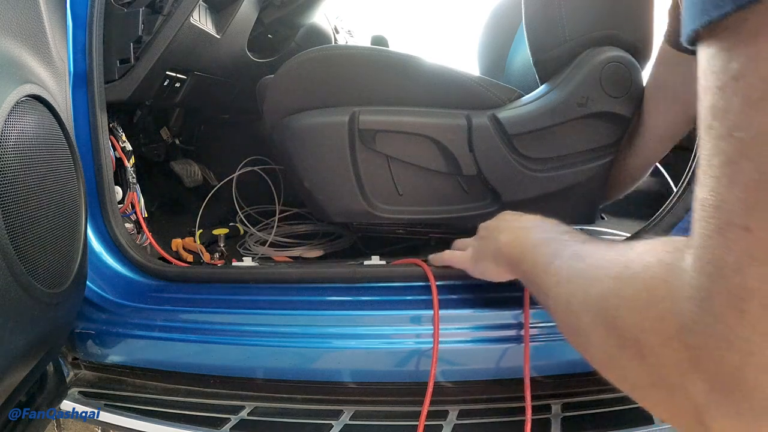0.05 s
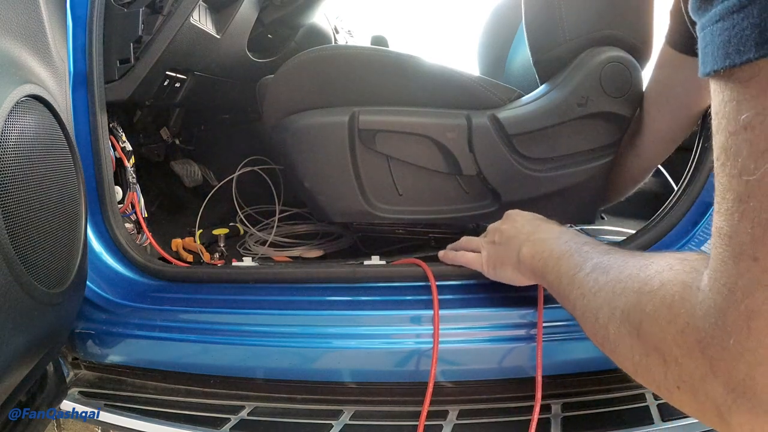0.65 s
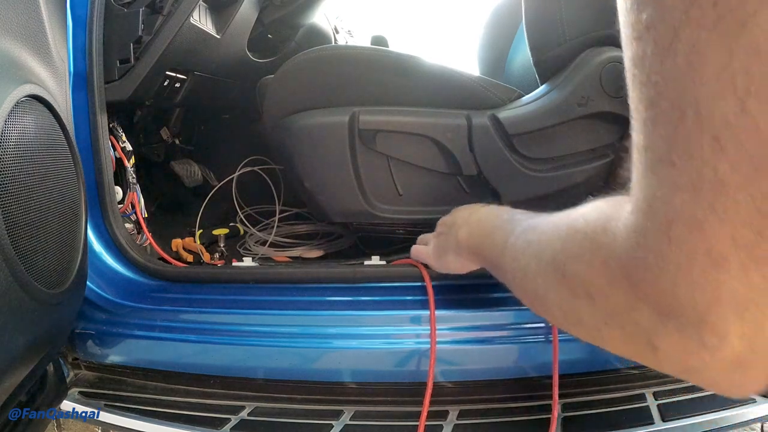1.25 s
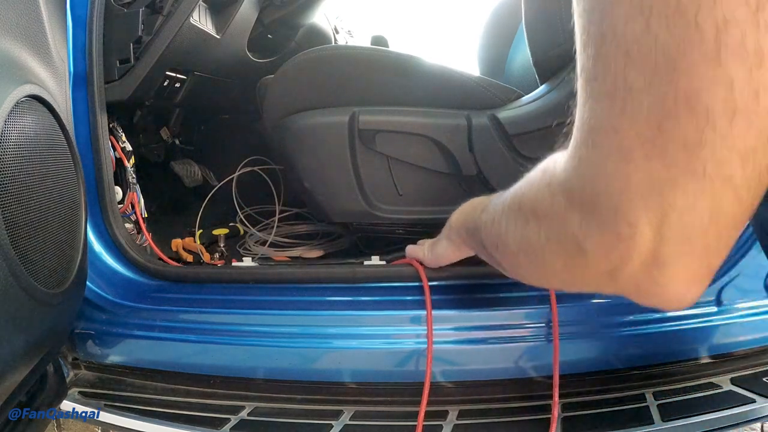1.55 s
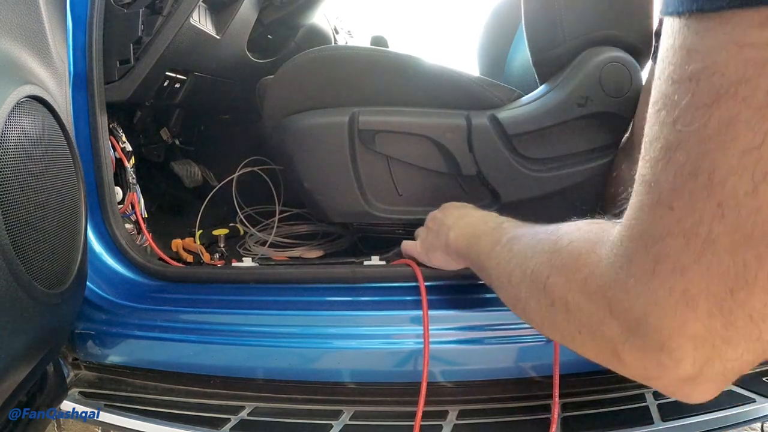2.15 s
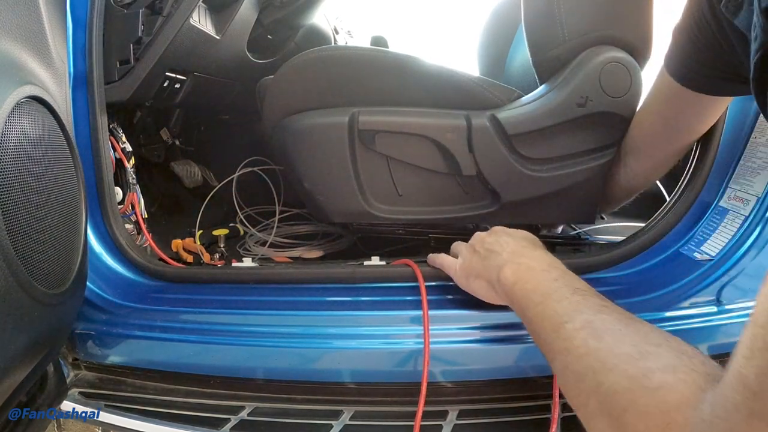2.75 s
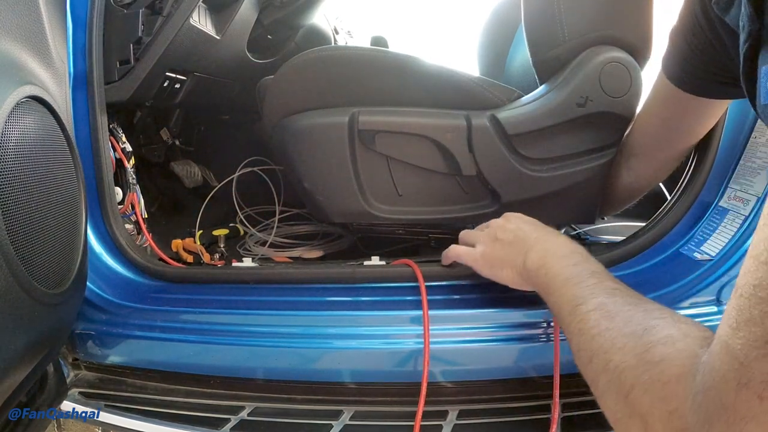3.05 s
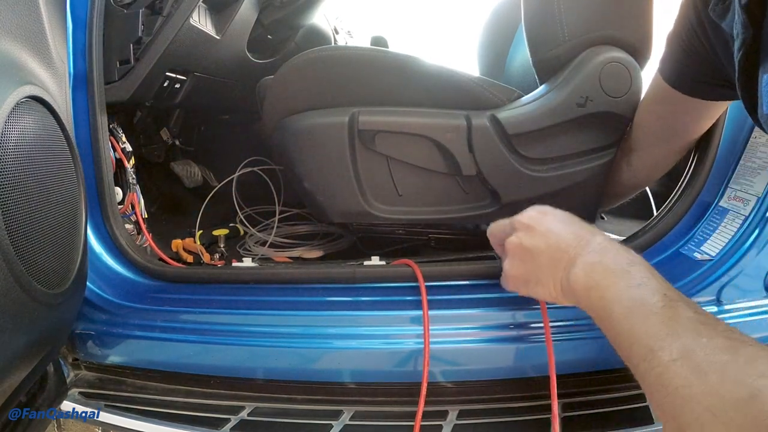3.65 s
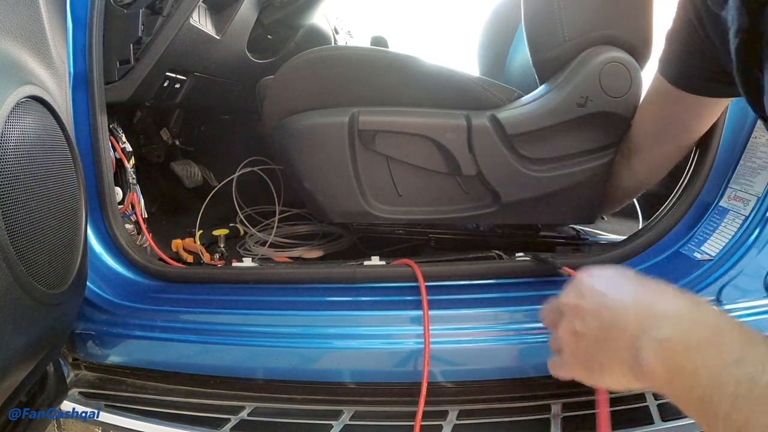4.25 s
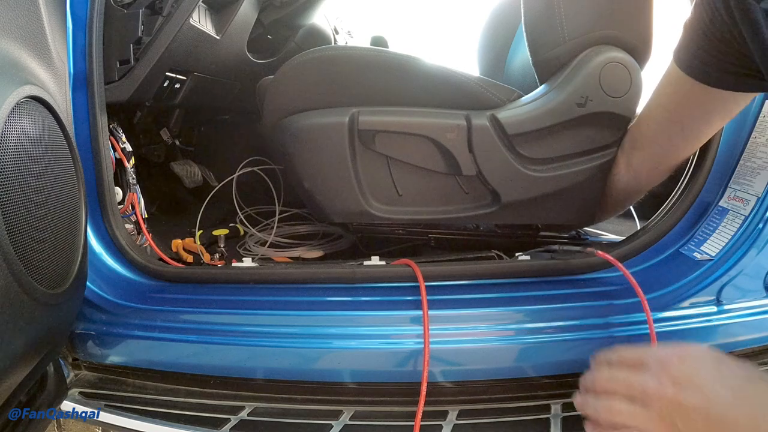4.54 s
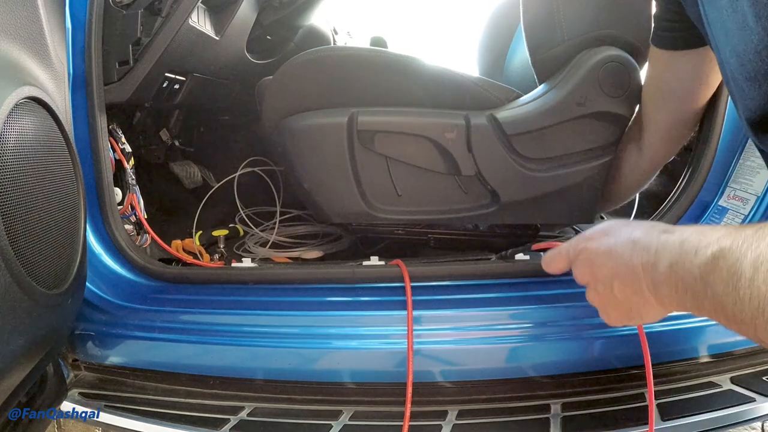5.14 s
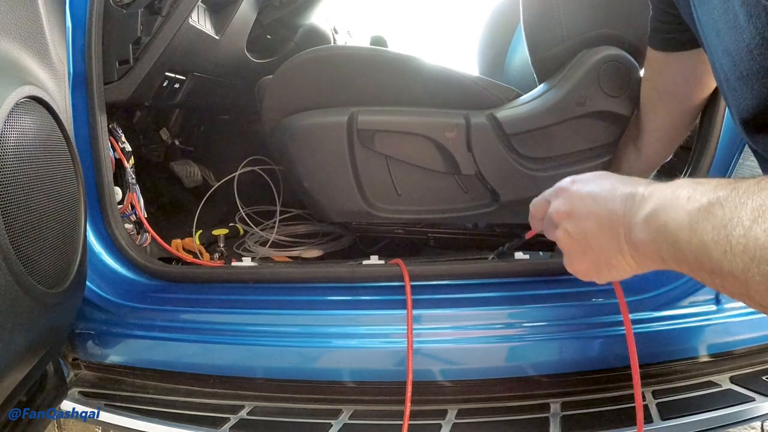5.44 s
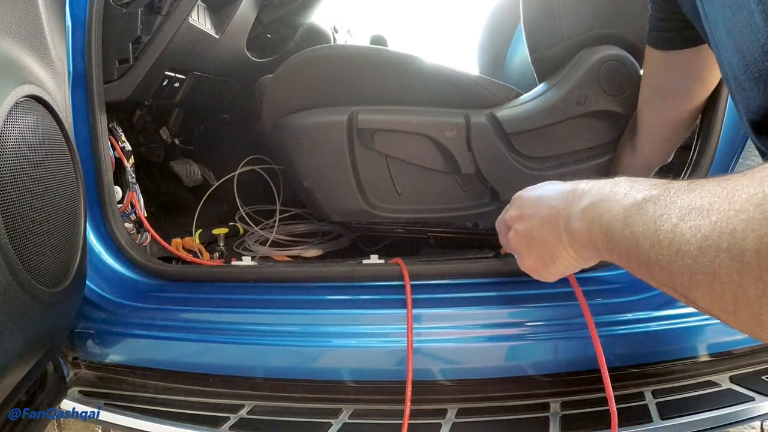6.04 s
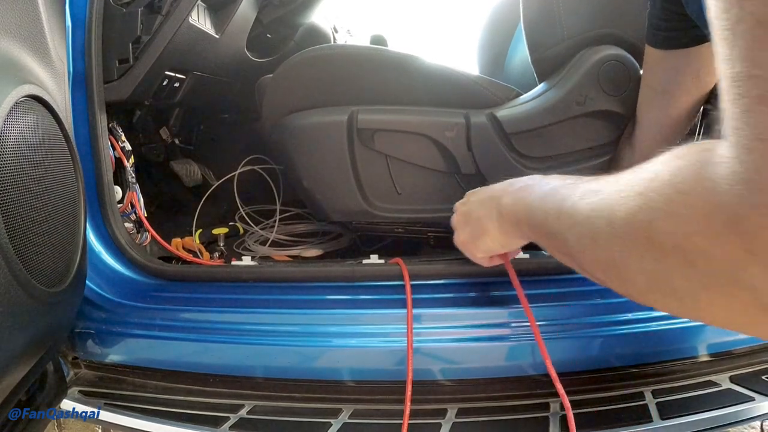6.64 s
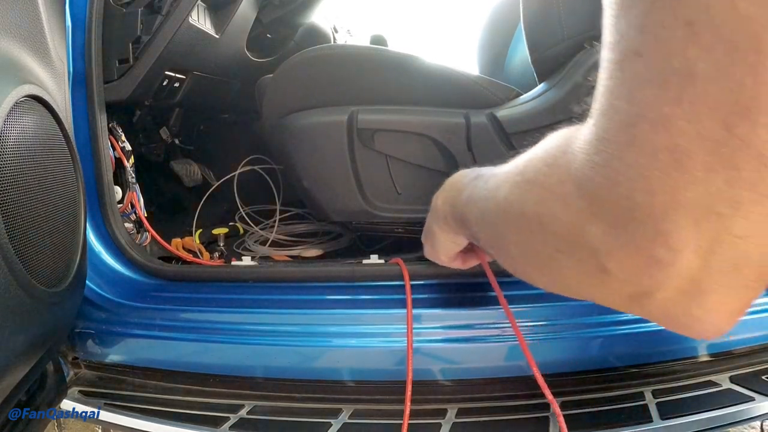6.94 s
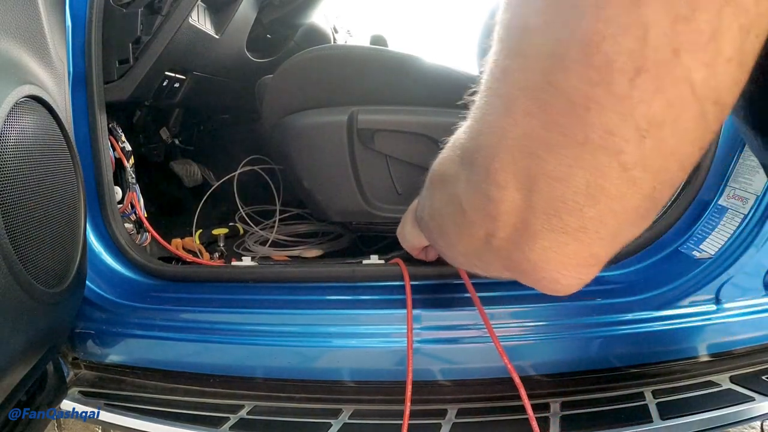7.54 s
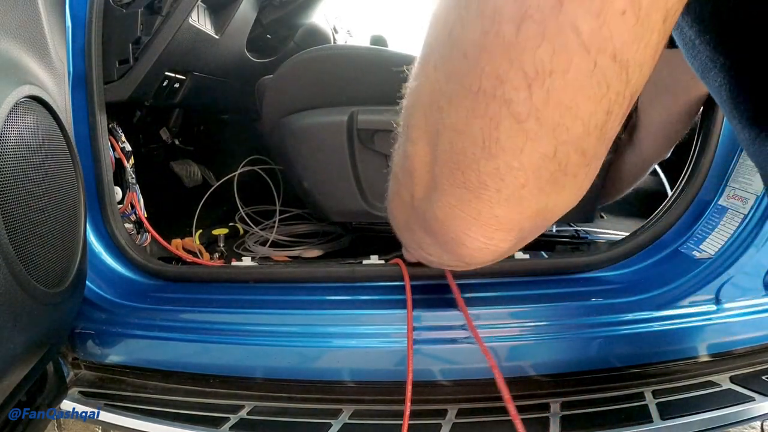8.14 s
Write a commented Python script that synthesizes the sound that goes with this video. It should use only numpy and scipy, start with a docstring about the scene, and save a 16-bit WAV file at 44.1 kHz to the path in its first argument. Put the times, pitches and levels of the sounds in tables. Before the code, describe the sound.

Close, scratchy pulls of a cable and hollow plastic knocks in a car doorway, over faint birds and a quiet outdoor hush.

```python
"""Hollow plastic knocks and scratchy dragging: a power cable is fed by hand under a car seat and along
the sill trim, heard from the open door. Each pull drags it over carpet and plastic in tiny slips; its
jacket sticks and squeaks now and then, and its slaps set the hollow trim thudding and clacking.
Small birds chirp some way off, over a quiet outdoor hush and a thin electronic whine.
Just past the middle, everything cuts out for an instant."""
import sys
import numpy as np
from scipy import signal
from scipy.fft import rfft, irfft
from scipy.io import wavfile
from scipy.ndimage import uniform_filter1d

SR = 44100
rng = np.random.default_rng(int(sys.argv[2]) if len(sys.argv) > 2 else 0)


def output_pcm(signal):
    """Save a mono or channel-first signal as 16-bit PCM at the path in sys.argv[1].

    Samples are clipped to [-1, 1] before scaling.
    """
    pcm = np.clip(np.atleast_2d(signal).T, -1, 1) * 32767
    wavfile.write(sys.argv[1], SR, np.round(pcm).astype(np.int16))


N = 365588
TIME = np.arange(N) / SR

# Pulls of the hand. Each row: start and length in seconds, then relative levels in dB of the rub on
# the hollow trim, the scrape on its edge and the hiss of the jacket.
HAND_PULLS = [(0.172, 0.058, -42, -54.5, -81), (0.532, 0.17, -52, -51.5, -73),
              (0.74, 0.18, -47.5, -56.5, -83), (0.889, 0.096, -47.5, -44.5, -56),
              (0.988, 0.09, -41.5, -35.5, -59.5), (1.144, 0.057, -42.5, -48.5, -69),
              (1.2, 0.12, -34.5, -48, -71), (1.351, 0.17, -41.5, -52.5, -66),
              (1.523, 0.14, -49, -49.5, -60), (1.772, 0.085, -37, -47.5, -65.5),
              (1.938, 0.15, -46, -55, -63), (2.594, 0.11, -51, -75, -77), (3.006, 0.032, -39.5, -52, -75),
              (3.107, 0.12, -40, -44.5, -75), (3.265, 0.26, -34, -59.5, -89.5),
              (3.595, 0.17, -42.5, -69, -71), (3.823, 0.19, -48, -65, -86), (4.43, 0.13, -57, -53.5, -70),
              (5.128, 0.028, -44, -49.5, -61), (5.379, 0.076, -40.5, -59.5, -75),
              (5.696, 0.077, -46, -63, -71), (5.85, 0.053, -43, -74, -112), (6.103, 0.34, -43, -62, -70.5),
              (6.462, 0.16, -38, -60, -83), (6.708, 0.15, -45.5, -57.5, -80),
              (6.962, 0.18, -46.5, -62, -70), (7.159, 0.079, -35, -48.5, -82),
              (7.256, 0.12, -41.5, -65, -85), (7.505, 0.29, -40.5, -50, -76), (7.78, 0.065, -37, -53, -71),
              (7.861, 0.12, -35, -46, -65), (8.065, 0.096, -37.5, -46.5, -69),
              (8.226, 0.041, -50, -53.5, -69)]
# Bright rasps over a sharp edge. Each row: start and length in seconds, relative level in dB.
EDGE_RASPS = [(0.107, 0.15, -55), (0.64, 0.042, -49), (1, 0.05, -44), (3.018, 0.03, -49),
              (3.142, 0.082, -53), (3.288, 0.11, -59), (3.65, 0.06, -49.5), (3.768, 0.029, -43),
              (7.417, 0.026, -54), (7.67, 0.05, -64), (7.866, 0.12, -45.5), (8.073, 0.057, -47),
              (8.243, 0.05, -51.5)]
# Jacket squeaks. Each row: start and length in seconds, first and last pitch in Hz, relative level in dB.
JACKET_SQUEAKS = [(1.03, 0.065, 978, 880, -37), (1.034, 0.068, 1460, 1327, -35.5),
                  (1.449, 0.081, 940, 870, -38), (1.18, 0.12, 530, 560, -37),
                  (3.043, 0.031, 1634, 1800, -46.5), (3.158, 0.032, 1020, 950, -49),
                  (3.229, 0.029, 614, 668, -31), (6.5, 0.17, 1027, 993, -46.5),
                  (6.526, 0.14, 1550, 1490, -51.5), (6.642, 0.082, 1002, 910, -47)]
# Blows on the trim. Each row: start in seconds, thud pitch in Hz, relative thud level in dB,
# clack pitch in Hz, relative clack level in dB, relative tick level in dB.
TRIM_KNOCKS = [(0.06, 230, -34.5, 990, -40.5, -47), (0.586, 556, -27, 1160, -25.5, -60),
               (0.592, 242, -31, 1150, -24, -65), (1.453, 186, -43.5, 1020, -39, -58),
               (1.49, 308, -34, 1030, -40, -55), (2.049, 252, -6.5, 1170, -29, -36.5),
               (2.058, 179, -21, 1190, -41, -38), (2.068, 250, -34, 1130, -33, -41),
               (3.074, 225, -43, 1040, -36.5, -58), (3.147, 296, -35, 1030, -34.5, -55),
               (3.299, 585, -30, 1160, -29, -46), (3.416, 260, -27.5, 1120, -34, -67.5),
               (3.662, 179, -36, 2100, -47, -36.5), (3.697, 210, -31.5, 2070, -29, -57),
               (3.752, 244, -20, 1070, -31, -52), (3.785, 530, -13, 1390, -23.5, -44),
               (3.791, 355, -11.5, 2230, -25.5, -24.5), (3.796, 146.4, -15.5, 1010, -22, -50),
               (4.048, 282, -31.5, 1000, -65, -59), (4.362, 430, -23, 2300, -23, -13),
               (4.363, 256, -31, 2010, -16.5, -18), (4.412, 328, -26, 1970, -35, -27.5),
               (6.077, 298, -32, 920, -40, -37.5), (6.185, 287, -27.5, 1110, -38, -42.5),
               (6.252, 563, -56, 1530, -30, -59), (6.713, 244, -34.5, 1450, -37, -65),
               (6.863, 220, -35.5, 3380, -50, -39), (7.54, 246, -28.5, 1000, -53, -66),
               (7.601, 231, -35, 1050, -45, -35.5)]
# Light clicks as the cable is worked along. Each row: start in seconds, relative level in dB.
LIGHT_CLICKS = [(2.298, -49), (2.344, -52), (2.394, -50), (2.444, -51), (2.476, -48.5), (2.534, -48),
                (2.633, -48), (2.698, -46)]
# Modes of trim and sill. Each row: pitch in Hz, relative level in dB, t60 in seconds before damping.
TRIM_MODES = [(154.7, -9, 0.72), (241, -0.5, 0.39), (298, -3.5, 0.54), (309.3, 2.5, 0.35), (391, -12, 0.56),
              (512, -50, 0.65), (534.5, -13, 0.23), (610, -49, 0.29), (720, -30, 0.077)]
# Tone curves of the cable's contact sounds. Each row: frequency in Hz, relative gain in dB.
RUB_EQ = [(50, -53), (100, -9.5), (150, -2.5), (240, 2.5), (340, -1.5), (450, -6.5), (570, -2.5),
          (760, -19), (1000, -14.5), (1600, -34)]
SCRAPE_EQ = [(300, -17.5), (650, 4.5), (950, 6.5), (1200, -2), (1500, -2.5), (1900, -3), (2500, -7),
             (3300, -13.5), (6000, -19.5)]
HISS_EQ = [(1200, 3.5), (3000, 1), (5000, 5.5), (8000, -1), (12000, -7), (16000, -1.5)]
RASP_EQ = [(900, -18), (1500, 2), (2200, 1.5), (3000, -2.5), (4000, -2), (7000, -36)]
TICK_EQ = [(1200, -50), (2400, 3), (4200, 10.5), (6000, 7.5), (9000, 1), (12000, -5), (16000, -6)]
# Tone curve of a plastic clack. Each row: multiple of its pitch, relative gain in dB.
CLACK_EQ = [(.15, -4.5), (.4, 10.5), (.7, 4), (1, 8.5), (1.3, -1.5), (1.8, -0.5), (2.7, -15.5), (5, -29.5)]
# Falling bird chirps. Each row: start and length in seconds, first pitch in Hz, relative level in dB.
BIRD_CHIRPS = [(0.011, 0.096, 4880, -46.5), (0.34, 0.073, 4940, -39), (0.541, 0.13, 4580, -47),
               (0.865, 0.1, 6520, -41), (1.597, 0.15, 4540, -43), (2.037, 0.053, 4600, -37),
               (2.385, 0.048, 4900, -37), (2.45, 0.04, 3900, -41), (2.528, 0.13, 4590, -45.5),
               (2.849, 0.16, 5420, -40), (3.51, 0.12, 4550, -43), (3.732, 0.13, 4700, -39),
               (4.04, 0.11, 5210, -48), (4.282, 0.087, 6150, -41.5), (4.529, 0.12, 4740, -40),
               (4.737, 0.11, 4530, -44), (5.18, 0.13, 5656, -40.5), (5.47, 0.11, 4730, -49),
               (5.595, 0.12, 4570, -46), (6.164, 0.15, 5690, -42), (6.79, 0.11, 5100, -48.5),
               (6.959, 0.085, 4500, -44.5), (7.07, 0.14, 5600, -42)]
# Short high peeps. Each row: start in seconds, first pitch in Hz, relative level in dB.
BIRD_PEEPS = [(0.729, 5400, -48.5), (1.15, 5900, -41.5), (3.351, 4630, -52), (5.379, 5920, -43),
              (7.75, 5690, -51), (8.2, 5500, -50.5)]
# Tone curve of the outdoor hush. Each row: frequency in Hz, relative gain in dB.
HUSH_EQ = [(15, -37), (25, -19), (86, -8.5), (219, 3), (301, -7.5), (438, -10), (978, -20), (1540, -25.5),
           (2430, -25.5), (3540, -18), (6200, -27), (10600, -29), (11500, -28.5), (12400, -31),
           (15000, -33)]
# Tones of the electronic whine. Each row: frequency in Hz, rms level in dB.
WHINE_TONES = [(11806, -83), (11865, -73.5), (15644, -79), (15703, -66.5)]

PULL_ATTACK_S, PULL_RELEASE_T60 = 0.041, 0.34
CREEP_RUB_DB, CREEP_SCRAPE_DB, CREEP_HISS_DB = -57, -61, -73.5  # the bed between pulls
CHATTER_HZ, CHATTER_HZ_PER_DB, CHATTER_DRIFT = 321, 4, 0.093
CHIRP_END_HZ, CHIRP_FALL_S = 3340, 0.105  # a chirp falls to about this pitch in its closing stretch
PEEP_S, PEEP_SAG = 0.077, 0.87  # length; last pitch as a share of the first


def dragging(rub_gain, scrape_gain, hiss_gain):
    """Dense slips shake the panel, sparser, gritty ones scrape its edge, the finest hiss."""
    panel_slips = slips(rate=980, spread_db=1.5, grip_db=1.8, grip_rate=45)
    body = unit(colour(panel_slips, RUB_EQ))
    ring = unit(signal.fftconvolve(panel_slips, trim_ring(damping=4.9))[:N])
    pressure_db = 20 * np.log10(scrape_gain) - CREEP_SCRAPE_DB
    creak = chatter(slips(rate=1500, spread_db=1, grip_db=6.5, grip_rate=18), pressure_db, width_hz=233)
    rub = undb(-4) * (body + undb(-4.5) * ring) + undb(-6) * creak
    scrape = unit(colour(slips(rate=550, spread_db=1, grip_db=1.8, grip_rate=60), SCRAPE_EQ))
    hiss = undb(11) * unit(colour(slips(rate=10000, spread_db=6.5, grip_db=0.7, grip_rate=52), HISS_EQ))
    return rub * rub_gain + scrape * scrape_gain + hiss * hiss_gain


def slips(rate, spread_db, grip_db, grip_rate):
    """Friction grain: about rate uneven slips a second, swelling as the grip tightens."""
    sizes = undb(spread_db * np.minimum(rng.exponential(size=N), 4)) * rng.choice([-1, 1], N)
    slipping = rng.random(N) < rate / SR
    return unit(slipping * sizes * undb(grip_db * wander(grip_rate)))


def chatter(pulses, pressure_db, width_hz):
    """Slips ring a resonance that rises as the cable is pressed harder on the edge."""
    hz = (CHATTER_HZ + CHATTER_HZ_PER_DB * pressure_db) * (1 + CHATTER_DRIFT * wander(8.2))
    carrier = np.exp(2j * np.pi * np.cumsum(hz) / SR)
    pole = np.exp(-np.pi * width_hz / SR)
    # shift down, smooth, shift back: a moving band-pass
    smoothed = signal.lfilter([1], [1, -2 * pole, pole ** 2], pulses / carrier)
    return unit((carrier * smoothed).real)


def hand_effort():
    """Rub, scrape and hiss gains: the pulls ride on the cable's slow creep."""
    power = np.outer(undb([CREEP_RUB_DB, CREEP_SCRAPE_DB, CREEP_HISS_DB]) ** 2, np.ones(N))
    for start, length, *levels_db in HAND_PULLS:
        for layer, db in zip(power, levels_db):
            add(layer, start, (undb(db) * stroke(length)) ** 2)
    return np.sqrt(power) * undb(wander(16))  # the hand's force wavers by about 1 dB


def stroke(length):
    """Envelope of one pull: the hand takes up the slack, holds, and the cable slides to rest."""
    t = TIME[:SR]
    attack = np.sin(np.pi / 2 * np.minimum(t / PULL_ATTACK_S, 1))
    return attack * fade(np.maximum(t - length, 0), PULL_RELEASE_T60)


def rasps():
    """Quick, coarse slips ring the thin edge of the plastic."""
    gain = np.zeros(N)
    for start, length, db in EDGE_RASPS:
        add(gain, start, undb(db) * stroke(length))
    return gain * unit(colour(slips(rate=790, spread_db=-3, grip_db=0.5, grip_rate=44), RASP_EQ))


def squeaks():
    """The jacket sticks and slips regularly enough to sing, with a weak octave on top."""
    out = np.zeros(N)
    for start, length, start_hz, end_hz, db in JACKET_SQUEAKS:
        phase, swell = gliding_tone(length, start_hz, end_hz, waver=0.042, waver_rate=450)
        add(out, start, undb(db) * swell * (np.sin(phase) + undb(-25) * np.sin(2 * phase)))
    return out * undb(1.4 * wander(90))


def knocks():
    """Each blow layers a thud, a floor-pan boom, a clack and a tick; the lightest touches only click."""
    out = np.zeros(N)
    for start, thud_hz, thud_db, clack_hz, clack_db, tick_db in TRIM_KNOCKS:
        add(out, start, undb(thud_db + 1) * thud(thud_hz, ring_db=-6, rumble_db=-9.5))
        boom_db = 1.25 * thud_db - 2.5  # heavy blows bring out the floor pan
        add(out, start, undb(boom_db) * flex(hz=139, rise_cycles=1.48))
        add(out, start, undb(clack_db - 5.5) * clack(clack_hz, t60=0.025, tail_db=-14.5, tail_t60=0.24))
        add(out, start, undb(tick_db - 6.5) * crack(TICK_EQ, t60=0.0074, tail_db=-14, tail_t60=0.17))
    for start, db in LIGHT_CLICKS:
        add(out, start, undb(db) * clack(hz=1200, t60=0.012, tail_db=-8, tail_t60=0.11))
    return out


def thud(hz, ring_db, rumble_db):
    """The struck panel hands its motion on to the sill's modes and the car body."""
    t = TIME[:SR // 2]
    ring = trim_ring(damping=2.3, reach_hz=1.6 * hz)
    rumble = colour(rng.standard_normal(len(t)) * fade(t, 0.28), RUB_EQ)
    tail = undb(ring_db) * ring / np.abs(ring).max() + undb(rumble_db) * rumble / np.abs(rumble).max()
    return flex(hz, rise_cycles=1) + tail * (1 - np.exp(-t * hz))


def flex(hz, rise_cycles):
    """A panel swings for a few cycles."""
    cycles = TIME[:SR // 2] * hz
    rise = cycles / rise_cycles
    return -rise ** 2 * np.exp(2 - 2 * rise) * np.sin(2 * np.pi * cycles)


def trim_ring(damping, reach_hz=SR):
    """The hollow trim rings after one blow; a soft blow hardly wakes the modes above reach_hz."""
    t = TIME[:SR // 2]
    ring = np.zeros(len(t))
    for hz, db, t60 in TRIM_MODES:
        gain = undb(db) / np.hypot(1, (hz / reach_hz) ** 2)
        ring += gain * fade(t * damping, t60) * np.sin(2 * np.pi * hz * t + rng.uniform(0, 2 * np.pi))
    return ring


def clack(hz, t60, tail_db, tail_t60):
    """A crack of plastic, voiced around one pitch."""
    return crack([(multiple * hz, db) for multiple, db in CLACK_EQ], t60, tail_db, tail_t60)


def crack(eq, t60, tail_db, tail_t60):
    """A brief burst of plastic vibration with a weaker rattle behind it."""
    t = TIME[:SR // 3]
    envelope = fade(t, t60) + undb(tail_db) * fade(t, tail_t60)
    burst = colour(rng.standard_normal(len(t)) * envelope, eq)
    return burst / np.sqrt(np.mean(burst[:SR // 100] ** 2))  # the first 10 ms set the level


def doorway(x, wet_db, t60, left_treble_db):
    """Places a sound on the right, reaching the left ear later, with short cabin reflections."""
    t = TIME[:SR // 6]
    response = two_ears(len(t), split_hz=5900) * fade(t, t60) * (1 - np.exp(-t / 0.0025))
    response = low_cut(response, hz=700, order=1)  # the bass escapes through the open door
    response *= undb(wet_db) / np.sqrt(np.sum(response[0] ** 2))
    response[0, 4] += 1  # the direct sound, four samples late on the left
    response[1, 0] += 1
    ears = signal.fftconvolve(x[None], response)[:, :N]
    bass = signal.sosfiltfilt(signal.butter(1, 1800, fs=SR, output="sos"), ears)
    return bass + undb([[left_treble_db], [1.5]]) * (ears - bass)  # the left is shaded in the treble


def birds():
    """Broken, falling whistles that open cleaner and turn raspy."""
    song = np.zeros(N)
    calls = [(start, length, hz, CHIRP_END_HZ * (1 + 0.045 * rng.standard_normal()), db)
             for start, length, hz, db in BIRD_CHIRPS]
    calls += [(start, PEEP_S, hz, PEEP_SAG * hz, db) for start, hz, db in BIRD_PEEPS]
    for start, length, start_hz, end_hz, db in calls:
        whistle, swell = gliding_tone(length, start_hz, end_hz, waver=0.068, waver_rate=800,
                                      glide_s=CHIRP_FALL_S, onset_waver=0.55, softness=0.6)
        rasp, _ = gliding_tone(length, 0.98 * start_hz, end_hz=3705, waver=0.1254, waver_rate=1300,
                               onset_waver=0.71)
        add(song, start, undb(db) * swell * (np.sin(whistle) + undb(-4) * np.sin(rasp)))
    return song * unit(undb(2 * wander(130)))  # a fast flutter breaks up the notes


def yard(x, direct_db, t60, echo_rate):
    """Walls around the yard scatter echoes; the far ones answer late, so the tail starts softly."""
    t = TIME[:SR]
    echoes = rng.standard_normal((2, len(t))) * (rng.random((2, len(t))) < echo_rate / SR)
    response = echoes * fade(t, t60) * (1 - 0.5 * fade(t, 0.26))
    response /= np.sqrt(np.sum(response ** 2, axis=1, keepdims=True))
    return undb(direct_db) * x + undb([[-0.8], [1.1]]) * signal.fftconvolve(x[None], response)[:, :N]


def background():
    """The bed: outdoor hush, faint air at each ear and the thin whine of electronics."""
    hush = unit(np.array([colour(x, HUSH_EQ) for x in two_ears(N, split_hz=800)]))
    air = unit(signal.sosfilt(signal.butter(1, 30, fs=SR, output="sos"), rng.standard_normal((2, N))))
    whine = sum(undb(db) * np.sqrt(2) * np.sin(2 * np.pi * hz * TIME) for hz, db in WHINE_TONES)
    return hush * undb(-50 + 0.3 * wander(5.9)) + undb(-94) * air + whine


def gliding_tone(length, start_hz, end_hz, waver, waver_rate, glide_s=1, onset_waver=1, softness=0.18):
    """Phase and envelope of an unsteady tone that glides and settles within its last glide_s."""
    progress = np.linspace(0, 1, int(length * SR))
    knots = np.arange(0, length, 1 / waver_rate)
    jitter = np.interp(progress * length, knots, rng.standard_normal(1024)[:len(knots)])
    jitter *= np.interp(progress, [0, 0.5], [onset_waver, 1])
    hold = max(1 - glide_s / length, 0)
    glide = np.sin(np.pi / 2 * np.clip((progress - hold) / (1 - hold) / 0.7, 0, 1)) ** 2
    hz = start_hz * (end_hz / start_hz) ** glide * (1 + waver * jitter)
    return 2 * np.pi * np.cumsum(hz) / SR, np.abs(np.sin(np.pi * progress)) ** softness


def two_ears(count, split_hz):
    """Stereo noise, narrow below split_hz and wide above."""
    mid, side = rng.standard_normal((2, count))
    side = undb(-12) * side + low_cut(side, split_hz, order=2)
    return np.array([mid + side, mid - side])


def colour(x, eq):
    """Minimum-phase EQ through (Hz, dB) points, 20 dB down an octave past each end."""
    hz, db = np.transpose(eq)
    size = 4096
    bin_hz = np.maximum(np.arange(size // 2 + 1), 0.5) * SR / size
    point_hz = np.r_[hz[0] / 2, hz, hz[-1] * 2]
    curve_db = np.interp(np.log(bin_hz), np.log(point_hz), np.r_[db[0] - 20, db, db[-1] - 20])
    cepstrum = irfft(np.log(undb(curve_db)))
    causal = np.r_[cepstrum[0], 2 * cepstrum[1:size // 2]]
    response = irfft(np.exp(rfft(causal, size)))
    return signal.fftconvolve(x, response)[:len(x)]


def low_cut(x, hz, order):
    """Roll off the lows below hz."""
    return signal.sosfilt(signal.butter(order, hz, "high", fs=SR, output="sos"), x)


def wander(rate):
    """Smooth random modulation with an rms of one, turning rate times a second."""
    step = int(SR / rate)
    held = np.repeat(rng.standard_normal(N // step + 1), step)
    return unit(uniform_filter1d(held, step)[:N])


def fade(t, t60):
    """Exponential decay by 60 dB in t60."""
    return np.exp(-np.log(1000) * t / t60)


def undb(db):
    """Decibels to gain."""
    return 10 ** (np.asarray(db) / 20)


def unit(x):
    """Scale to an rms of one."""
    return x / np.sqrt(np.mean(x ** 2))


def add(out, start, x):
    """Mix x into out from start seconds on."""
    i = max(int(start * SR), 0)
    out[i:i + len(x)] += x[:max(N - i, 0)]


def scene():
    """Cable work up close in the doorway, birds and hush outside."""
    # small panels radiate little deep bass
    blows = doorway(low_cut(knocks(), hz=100, order=3), wet_db=-1, t60=0.012, left_treble_db=-4)
    gains = hand_effort()
    friction = dragging(*gains) + rasps() + squeaks()
    drag = doorway(low_cut(friction, hz=100, order=3), wet_db=-1.5, t60=0.018, left_treble_db=-3.5)
    # the cable touches in many places, so each ear also gets treble of its own
    scattered = low_cut([dragging(*gains), dragging(*gains)], hz=1500, order=2)
    cable = blows + drag + undb([[-5], [-1]]) * scattered
    return cable + yard(birds(), direct_db=-6, t60=0.5, echo_rate=2000) + background()


def record(dry):
    """The hardest peaks are rounded, the sound cuts out for an instant, and the very top is cut off."""
    ceiling, top_hz = 0.85, 15900
    gap_start_s, gap_end_s = 5.078, 5.110
    rounded = dry / (1 + (dry / ceiling) ** 6) ** (1 / 6)
    gate = (TIME < gap_start_s) | (TIME > gap_end_s)
    return signal.sosfilt(signal.ellip(10, 0.2, 80, top_hz, fs=SR, output="sos"), rounded * gate)


dry = scene()
out = record(dry)
output_pcm(out)
```